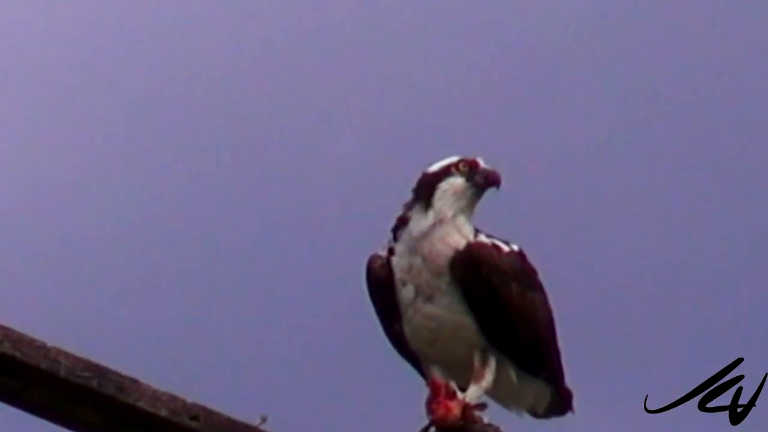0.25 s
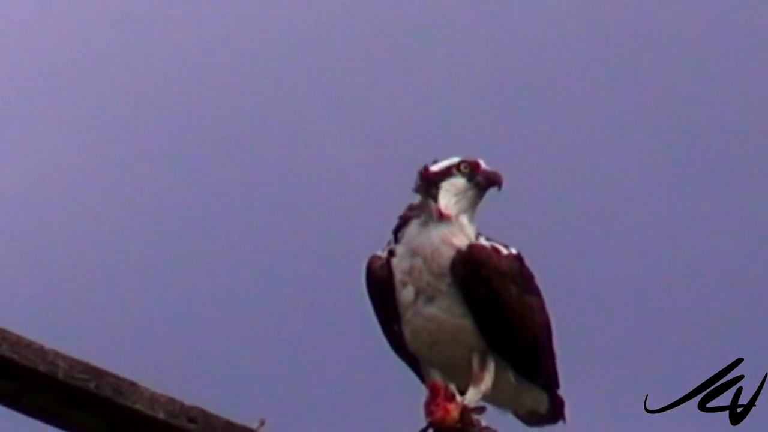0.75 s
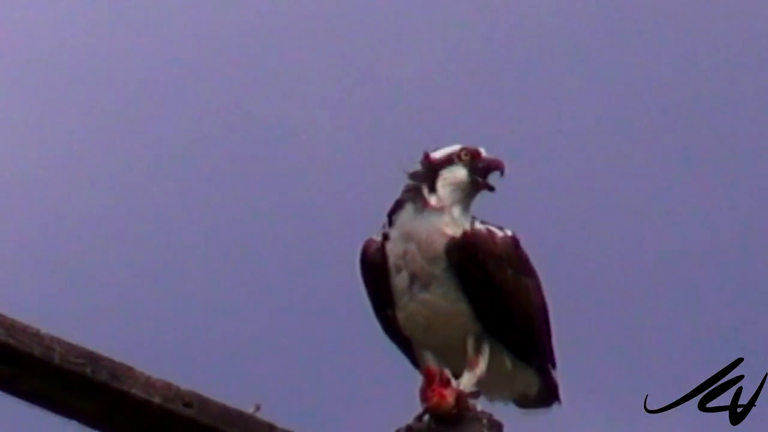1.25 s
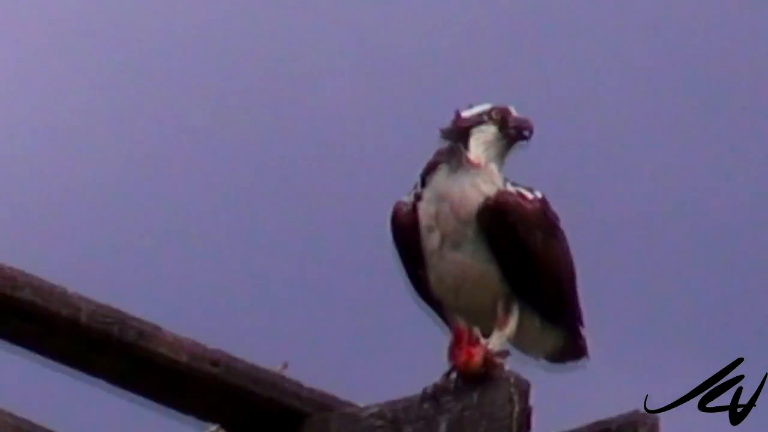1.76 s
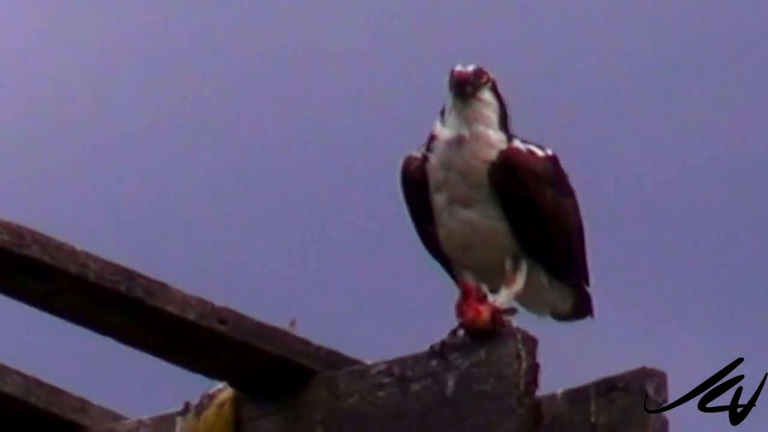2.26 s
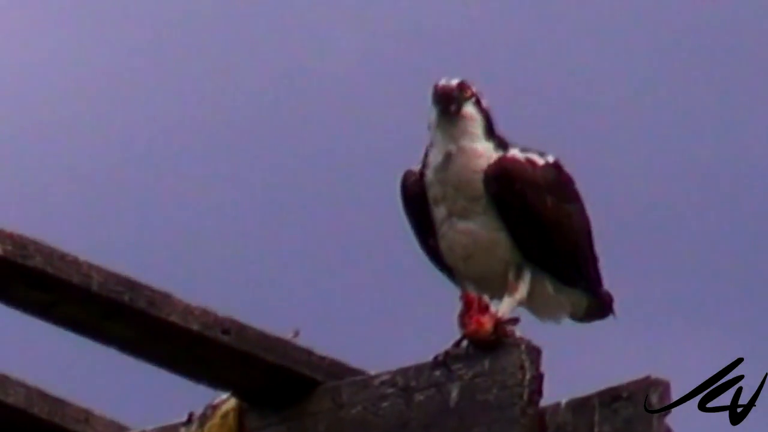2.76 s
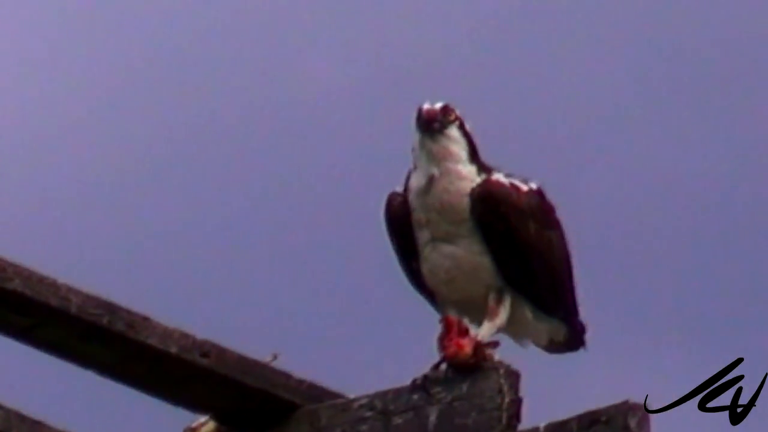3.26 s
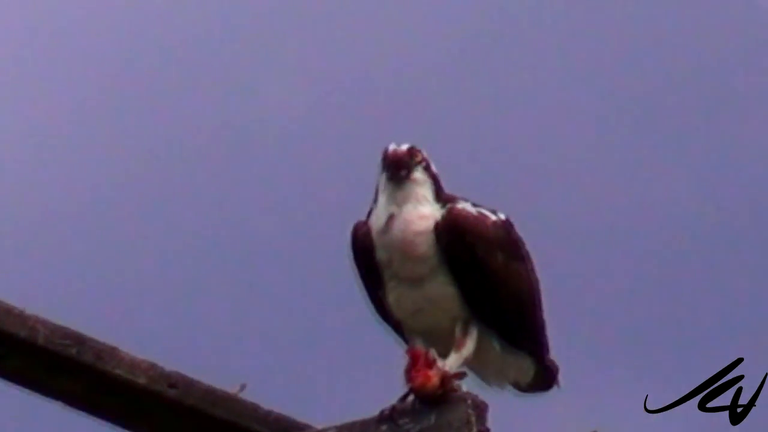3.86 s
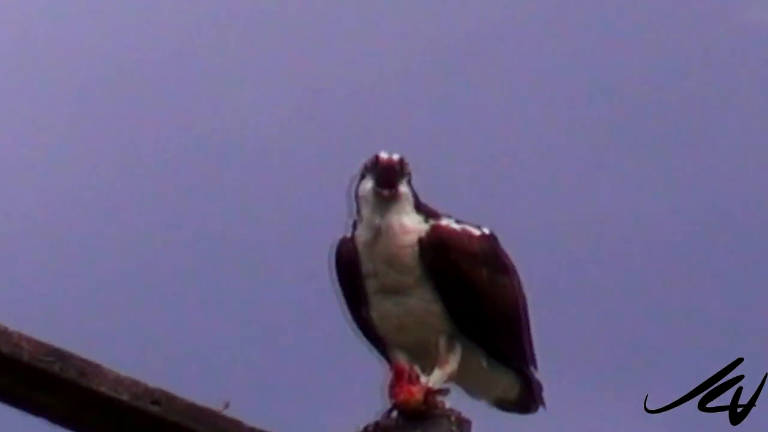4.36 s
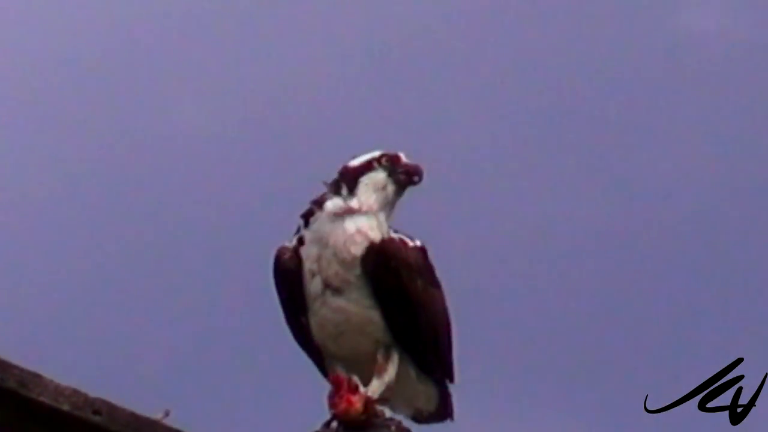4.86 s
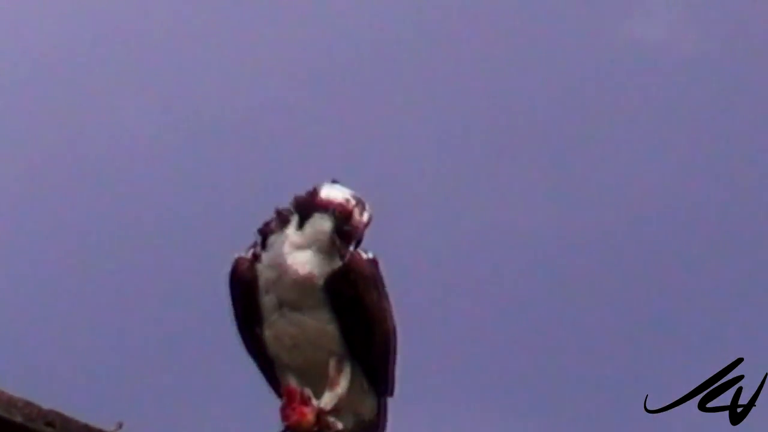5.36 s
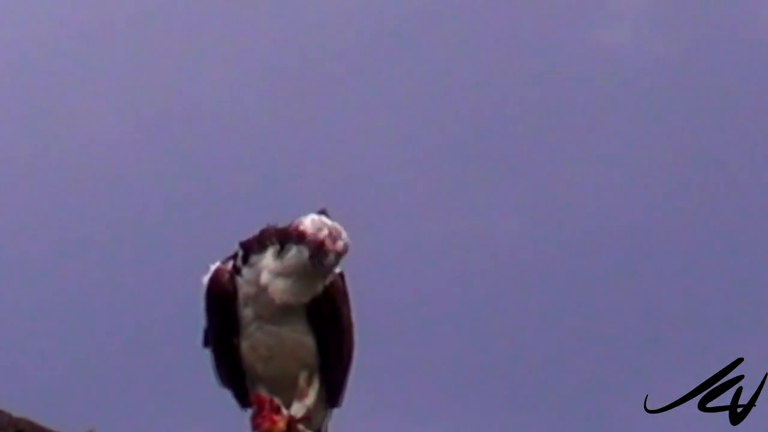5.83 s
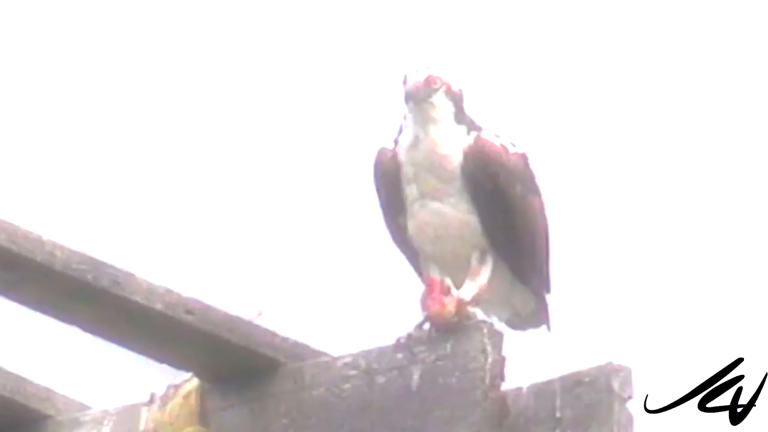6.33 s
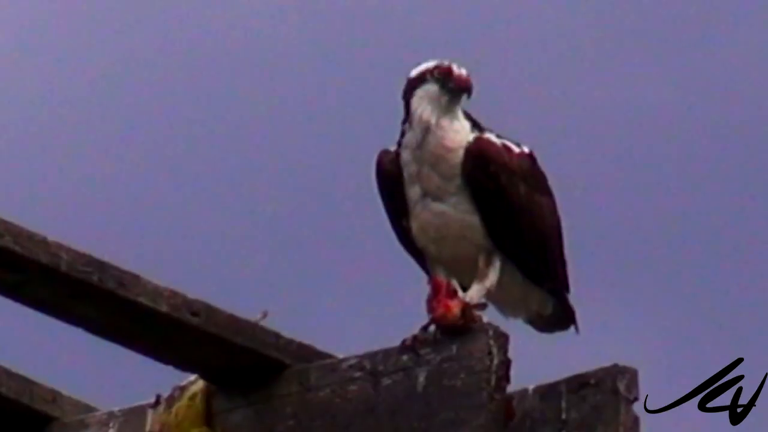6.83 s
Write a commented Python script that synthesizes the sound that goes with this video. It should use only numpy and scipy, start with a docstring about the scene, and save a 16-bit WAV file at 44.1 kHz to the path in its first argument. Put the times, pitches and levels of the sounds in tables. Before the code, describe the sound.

An osprey on an outdoor perch gives nine short, piercing falling whistles, loudest in the middle, over soft breeze, distant traffic and faint camera-handling knocks.

```python
"""Bird of prey calling from a perch

A perched bird of prey whistles nine short, mostly falling chirps; two use both sides of its syrinx (voice box).
Each is a gliding sine with overtones; echoes within a few ms notch it and fading noise makes the trees' faint tail.
Shaped noise makes the breeze, far traffic, a motor drone and leaves; short sine glides make small birds' peeps.
A hand shifts on the camera in noise snaps, knocks and rustles, and breeze thumps its microphone in sine bumps."""
import sys
import numpy as np
from scipy import signal
from scipy.fft import rfft, irfft, next_fast_len
from scipy.io import wavfile
from scipy.ndimage import uniform_filter1d, map_coordinates

SR = 44100
rng = np.random.default_rng(int(sys.argv[2]) if len(sys.argv) > 2 else 0)


def store_pcm(level_fs):
    """Save levels as 16-bit WAV."""
    pcm = np.round(np.clip(level_fs, -1, 1) * 32767).astype(np.int16)
    wavfile.write(sys.argv[1], SR, np.atleast_2d(pcm).T)


N = 312669  # length in samples
TOP_HZ = 15790  # upper band limit

# The pitch path of each chirp, one list per chirp. Each row: time in seconds, pitch in Hz.
CHIRP_PITCHES = [
    [(0, 2540), (0.018, 2338), (0.032, 2242), (0.047, 2140), (0.065, 1780)],
    [(0.588, 3330), (0.598, 3080), (0.612, 2836), (0.64, 2670), (0.65, 2880), (0.664, 2810), (0.682, 2352),
     (0.696, 2176), (0.708, 2110), (0.721, 1880)],
    [(1.315, 3766), (1.335, 3256), (1.369, 3066), (1.411, 2637), (1.441, 2245), (1.456, 2110),
     (1.472, 1890)],
    [(2.102, 4380), (2.118, 4465), (2.133, 4000), (2.15, 3674), (2.182, 3435), (2.214, 3229), (2.246, 2905),
     (2.28, 2287), (2.293, 2150), (2.306, 1850)],
    [(2.942, 4620), (2.963, 5340), (2.979, 4300), (2.995, 3790), (3.03, 3529), (3.084, 3187), (3.128, 2383),
     (3.146, 2150), (3.16, 1930)],
    [(3.752, 2955), (3.768, 3010), (3.792, 2922), (3.834, 2858), (3.9, 2812), (3.93, 2710), (3.948, 2590)],
    [(4.399, 5246), (4.414, 5200), (4.427, 4140), (4.445, 3520), (4.483, 3300), (4.523, 2996),
     (4.545, 2651), (4.571, 2130), (4.582, 1930)],
    [(5.327, 2871), (5.353, 2904), (5.381, 2854), (5.459, 2820), (5.485, 2757), (5.503, 2584),
     (5.525, 2450)],
    [(6.078, 3460), (6.088, 3182), (6.108, 2850), (6.128, 2543), (6.158, 2226), (6.17, 2131), (6.184, 1810)],
]


def amp(db):
    """Turn dB into a gain."""
    return 10 ** (np.asarray(db) / 20)


def unit(x):
    """Scale a sound to an rms (average strength) of 1."""
    return x / np.sqrt(np.mean(x ** 2) + 1e-20)


def along(points, hz):
    """Read a curve of (Hz, value) points, with frequency on a log axis."""
    f, v = np.transpose(points)
    return np.interp(np.log(hz + 1), np.log(f + 1), v)


def curves(rows, glide=.005):
    """Give one value per sample for each column after the time, with corners rounded over glide seconds."""
    s, *cols = np.transpose(rows)
    width = max(round(glide * SR), 1)
    t = np.arange(N) / SR
    return [uniform_filter1d(np.interp(t, s, c), width) for c in cols]


def sounding(t0, t1, fade):
    """Stay at 1 between two times, with a fade before and after, all in seconds."""
    t = np.arange(N) / SR
    ramp = np.minimum(t - t0 + fade, t1 + fade - t) / fade
    return np.clip(ramp, 0, 1) ** 2


def wobble(rate):
    """Draw a smooth random curve through rate random points a second."""
    knots = rng.standard_normal(int(N * rate / SR) + 4)
    return map_coordinates(knots, [np.arange(N) * rate / SR])


def filtered(x, response):
    """Filter x by a response that depends on frequency and may be complex."""
    m = next_fast_len(N + SR // 2)
    spectrum = rfft(x, m) * response(np.fft.rfftfreq(m, 1 / SR))
    return irfft(spectrum, m)[..., :N]


def peak(hz, centre_hz, width_hz):
    """Respond like one resonance, which rings only after it is driven."""
    return 1j * hz * width_hz / (centre_hz ** 2 - hz * hz + 1j * hz * width_hz)


def sides(pan_db):
    """Give left and right gains; a positive pan makes the left louder."""
    return amp(np.array([[.5], [-.5]]) * pan_db)


def rush(spectrum, patchy_db):
    """Make stereo noise of rms 1, with random louder and softer patches in time and pitch."""
    # How alike left and right are. Each row: frequency in Hz, likeness from 0 to 1.
    likeness = [(40, .96), (130, .84), (290, .7), (640, .81), (1400, .82), (3800, .95), (6800, .72),
                (15000, .82)]
    # Left-right balance. Each row: frequency in Hz, left over right in dB.
    balance = [(60, 1.5), (130, 1.5), (290, -5.5), (640, 1.5), (1410, 4.5), (3100, 0), (6820, 2),
               (15000, -0.5)]
    z = signal.stft(rng.standard_normal((2, N)), nperseg=512)[2]
    field = uniform_filter1d(rng.standard_normal(z.shape[1:]), size=6, axis=0)
    field = uniform_filter1d(field, size=14, axis=1)
    pair = signal.istft(z * amp(patchy_db * unit(field)), nperseg=512)[1][:, :N]

    def shares(hz):
        turn = np.arccos(np.clip(along(likeness, hz), -1, 1)) / 2
        return amp(along(spectrum, hz)) * [np.cos(turn), np.sin(turn)]

    mid, side = filtered(pair, shares)
    stereo = np.array([mid + side, mid - side])
    return unit(filtered(stereo, lambda hz: sides(along(balance, hz))))


def lead_in():
    """Make a falling, swelling sine for the chirp already under way; only its echoes are still in the air."""
    # In order: length in seconds, start pitch in Hz, end pitch in Hz, level at the end in dB.
    length, hz0, hz1, db = (0.83, 2950, 2570.5, -29)
    n = round(length * SR)
    phase = 2 * np.pi * np.cumsum(np.linspace(hz0, hz1, n)) / SR
    return amp(db) * np.linspace(0, 1, n) * np.sin(phase)


def bird():
    """Whistle near-pure glides; the weak side of the syrinx modulates them into sum and difference tones."""
    # How each chirp is blown. Each row: level in dB before the pitch curve, attack in seconds,
    # the strongest point as a share of the length, dB lost per length away from there, release in seconds,
    # octave and third harmonic in dB against the whistle before their own curves,
    # left-right balance in dB, strength aimed at the trees in dB.
    efforts = [(-16.5, 0.00033, 0.57, 11, 0.0028, -21, -36, 3, -2.5),
               (-15, 0.0077, 0.94, 17, 0.0017, -21.5, -48, 3, -2.5),
               (-15.5, 0.034, 0.46, 6, 0.0033, -22.5, -42.5, 2, -0.2),
               (-13.5, .008, .75, 11.5, 0.014, -23.5, -47, -0.7, -1.1),
               (-10.5, 0.0024, 0.69, 8.1, 0.018, -22.5, -45, -0.3, -3.5),
               (-17, 0.0057, .4, 4.8, 0.011, -13.5, -28, 0, -6.5),
               (-8, .004, 0.59, 13.13, 0.018, -23, -44, -0.3, -3.2),
               (-17.5, 0.0037, 0.95, 9.4, 0.034, -8.5, -25, 0.5, -3.5),
               (-17, 0.014, 0.51, 10.3, 0.0027, -21.5, -37, 1, 0.2)]
    # Strength of the whistle by pitch. Each row: pitch in Hz, gain in dB.
    whistle_gain = [(1850, -26), (2070, -14), (2190, -4.5), (2330, -4), (2520, -1.5), (2800, 0),
                    (3300, 0.25), (3600, -1), (4200, -12), (5250, -23)]
    # Strength of the octave by pitch of the whistle. Each row: whistle pitch in Hz, gain in dB.
    octave_gain = [(1900, -4), (2200, 3.9), (2400, 6), (2800, 1.4), (3200, -1.5), (3460, -10), (3700, 4.5),
                   (4200, 5.5), (5200, 5)]
    # Higher overtones. Each row: harmonic number, dB over the chirp's third-harmonic setting,
    # further dB per octave of pitch above 3000 Hz.
    higher = [(3, 0.1, 14), (4, -13.5, 0.5)]
    # Air bursts near the start of some chirps. Each row: start in seconds, gain in dB before filtering.
    air_bursts = [(2.96, -49.5), (2.975, -47), (3.747, -36.5), (4.417, -55.5), (5.323, -42.5)]
    attack_db, release_db = 24, 14  # how far each end is pulled down, beside the slope and the fades

    t = np.arange(N) / SR
    low, upper, pan_db, aim_db = np.zeros((4, N))
    for rows, effort in zip(CHIRP_PITCHES, efforts):
        db, attack_s, crest, slope_db, release_s, bright_db, third_db, facing_db, trees_db = effort
        hz, = curves(rows, glide=.007)
        start, end = rows[0][0], rows[-1][0]
        age = np.clip(t - start, 0, end - start)
        ends_db = attack_db * np.exp(-age / attack_s)
        ends_db += release_db * np.exp((age + start - end) / release_s)
        off_crest = np.abs(age / (end - start) - crest)
        level_db = db + along(whistle_gain, hz) - slope_db * off_crest - ends_db
        phase = 2 * np.pi * np.cumsum(hz * (1 + 0.0023 * wobble(200))) / SR
        size = amp(level_db + .7 * wobble(120)) * sounding(start, end, .003)
        low += size * np.sin(phase)

        # the overtones flicker at random in level, faster than the whistle glides
        flicker_db = 2.5 * wobble(70)
        octave_db = bright_db + along(octave_gain, hz) - .4 * ends_db + flicker_db
        over = amp(octave_db) * np.cos(2 * phase)
        tight = np.log2(hz / 3000)  # tighter membranes at high pitch close more sharply
        for k, extra_db, per_octave_db in higher:
            harmonic_db = extra_db + third_db + per_octave_db * tight + 2.9 * wobble(40)
            over += amp(harmonic_db) * (k * hz < TOP_HZ) * np.sin(k * phase)
        upper += size * over
        # balance and aim hold until the next chirp
        pan_db[t > start - .05] = facing_db
        aim_db[t > start - .05] = trees_db

    weak, octave, on = weak_side()
    mixed = amp(24.5) * low * weak + amp(32.5) * upper * weak
    mixed = filtered(mixed, lambda f: peak(f, 5500, 7000) ** 2)
    # two voices fighting shake every partial into a blur
    shake = unit(filtered(rng.standard_normal(N), lambda f: 1 / (1 + (f / 1000) ** 4)))
    rasp = on * shake * (amp(-18.5) * low + amp(-13) * upper)
    blur = filtered(rasp, lambda f: 1 / (1 + (2600 / (f + 1)) ** 6))  # keeps the treble
    gusts = sum(amp(db) * sounding(s, s + 0.011, .003) for s, db in air_bursts)
    breath = filtered(gusts * rng.standard_normal(N), lambda f: peak(f, 5000, 3000) ** 2)
    return low + upper + weak + octave + blur + mixed + breath, pan_db, aim_db


def near(x):
    """Add two early echoes to the direct sound; the surfaces return only the lower tones."""
    # Each row: delay in seconds, level in dB, frequency in Hz above which the echo is lost.
    surfaces = [(.0027, 0, 2950), (.00519, -17, 4200)]

    def response(f):
        total = 1
        for s, db, hz in surfaces:
            total = total + amp(db) * np.exp(-2j * np.pi * f * s) / (1 + (f / hz) ** 18)
        return total

    return filtered(x, response)


def scatter(early, x, decays, tone, rise_s, spread, pan_db, edge=(1, 0)):
    """Answer each call with fresh fading noise; each frequency dies at its own speed."""
    x = np.concatenate([early, x])
    wet = np.zeros((2, len(x)))
    for rows in CHIRP_PITCHES:
        hz, t, z = signal.stft(rng.standard_normal((2, SR)), SR, nperseg=256)
        drop_db = edge[1] * np.clip((t - edge[0]) / 0.11, 0, 1)
        decay_db = -60 * t / along(decays, hz)[:, None]
        shape = (1 - np.exp(-t / rise_s)) * amp(drop_db + decay_db)
        colour = amp(along(tone, hz))[:, None]
        a, b = signal.istft(z * shape * colour, SR, nperseg=256)[1]
        energy = np.sum(shape[16] ** 2) * 128  # of the fade near the call's pitch
        tail = sides(pan_db) * [a + spread * b, a - spread * b] / np.sqrt(energy)
        # the slice begins one lead-in length before the call, so it also holds what came just before
        i = round(rows[0][0] * SR)
        j = round((rows[-1][0] + .05) * SR) + len(early)
        answer = signal.fftconvolve(x[None, i:j], tail, axes=1)[:, :len(x) - i]
        wet[:, i:i + answer.shape[1]] += answer
    return wet[:, len(early):]


def air():
    """Mix the background: breeze, far traffic with a motor drone and a tyre band, and leaves, all from noise."""
    # Strength of the breeze. Each row: time in seconds, level in dB before a random wobble.
    breeze_level = [(0, -61), (0.45, -61), (0.63, -53), (0.91, -61), (1.56, -60), (2.2, -55.5),
                    (2.9, -60.5), (3.53, -60), (3.85, -58), (4.7, -63), (4.95, -55.5), (5.15, -60.5),
                    (5.8, -61), (6.44, -61), (7.09, -59)]
    # Tone of the breeze. Each row: frequency in Hz, relative level in dB per Hz.
    breeze_tone = [(12, -37), (20, -10), (75, -1), (140, -0.5), (271, -12), (300, -30.5), (390, -35),
                   (660, -120)]
    # Tone of the traffic. Each row: frequency in Hz, relative level in dB per Hz.
    traffic_tone = [(120, -31.5), (200, -8), (270, -2), (494, -2), (523, -0.5), (785, -4.5), (873, -8),
                    (1260, -10), (1400, -12.5), (1820, -39.5), (3080, -120)]
    # Tone of the leaves. Each row: frequency in Hz, relative level in dB per Hz.
    leaves_tone = [(590, -42.5), (1000, -23.5), (1400, -5.5), (2500, -6), (3300, -9), (5000, -9.5),
                   (7500, -11), (10000, -16.5), (13000, -18.5), (15800, -18.5)]
    # A far motor. In order: loud from and to in seconds, fade in seconds,
    # level added while loud in dB, level always there in dB.
    start, end, fade, near_db, far_db = (4, 5, 1, -61.5, -69)
    traffic_db, leaves_db, tyres_db = -57.5, -58, -66

    def band(hz, width_hz):
        return unit(filtered(rng.standard_normal(N), lambda f: peak(f, hz, width_hz) ** 2))

    breeze = amp(curves(breeze_level)[0] + 2.6 * wobble(9)) * rush(breeze_tone, patchy_db=2.0)
    traffic = amp(traffic_db + 0.27 * wobble(4.9)) * rush(traffic_tone, patchy_db=2.36)
    motor = amp(far_db) + amp(near_db) * sounding(start, end, fade)
    drone = motor * band(210, 80) * sides(-2)
    tyres = amp(tyres_db) * band(800, 90)
    leaves = amp(leaves_db + .4 * wobble(3.1)) * rush(leaves_tone, patchy_db=1.56)
    return breeze + traffic + drone + tyres + leaves


def handling():
    """Shift a hand on the camera: each tick is a noise snap plus a body knock, and cloth rustles too."""
    # Each row: start in seconds, snap gain in dB before filtering, knock gain in dB, left-right balance in dB,
    # snap centre in Hz, time in seconds for the snap to fall 60 dB.
    ticks = [(.415, -53, -14.5, -6, 2920, .02), (1.284, -40.5, -17, -3, 5830, 0.014),
             (1.646, -32.5, -8, -2.5, 6200, 0.018), (1.878, -45, -8.5, -4.5, 6200, 0.037),
             (2.635, -41.5, -14, 11, 4370, 0.071), (3.591, -58.5, 1, 5.5, 5770, .008),
             (3.626, -42, -1, 8, 6260, 0.005), (4.03, -48, -9, 11, 1520, 0.024),
             (4.32, -57, -12, 5.5, 1506, 0.035)]
    # Resonances of the camera body. Each row: frequency in Hz, width in Hz, gain in dB.
    body_modes = [(118, 62, 4), (243, 430, -2.5), (590, 170, 3), (1640, 390, -6.5)]
    # Each row: start in seconds, length in seconds, centre in Hz, level in dB before a random wobble.
    rustles = [(.87, .02, 8000, -63), (.98, .04, 5000, -64), (1.8, .11, 7500, -60), (2.64, .03, 5300, -58),
               (4.24, .07, 2700, -57), (4.77, .04, 5200, -63), (6.96, .06, 3500, -63)]

    def body(f):
        return sum((-1) ** k * amp(db) * peak(f, c, w) for k, (c, w, db) in enumerate(body_modes))

    t = np.arange(N) / SR
    out, blows = np.zeros((2, N)), np.zeros((2, N))
    for s, db, knock_db, pan_db, hz, t60 in ticks:
        burst = (t >= s) * amp(-60 * np.abs(t - s) / t60) * rng.standard_normal(N)
        snap = filtered(burst, lambda f: peak(f, hz, 1.3 * hz) ** 2)
        out += sides(pan_db) * amp(db) * snap
        blows[:, round(s * SR)] = sides(pan_db)[:, 0] * amp(knock_db)
    cloth = rng.standard_normal((2, N)) + 2.1 * rng.standard_normal(N)  # mostly shared by both sides
    for s, length, hz, db in rustles:
        grit = unit(filtered(cloth, lambda f: peak(f, hz, 0.44 * hz) ** 2))
        out += amp(db + 2.5 * wobble(150)) * sounding(s, s + length, .02) * grit
    return out + filtered(blows, body)


def thumps():
    """Push the microphone with puffs of breeze: a sine that swells and dies within a cycle or two."""
    # Each row: start in seconds, gain in dB before the swell, pitch in Hz, left-right balance in dB.
    pushes = [(0.507, -15.5, 115, 4), (0.528, -20.5, 89, 5), (0.602, -25, 59, -3), (0.63, -15.5, 105, 1.5),
              (0.676, -23, 72, 0), (.715, -29, 90, 2), (1.136, -21, 85.5, 3), (1.161, -24.5, 107, 3),
              (1.773, -11, 181, -3.5), (1.78, -16.5, 141, 1), (1.889, -18, 197, -5),
              (1.901, -17.5, 248, -7), (3.761, -22, 108, 1)]
    out, t = np.zeros((2, N)), np.arange(N) / SR
    for s, db, hz, pan_db in pushes:
        cycles = np.clip(t - s, 0, 1) * hz
        swell = cycles * np.exp(-cycles / 0.31)
        out += sides(pan_db) * amp(db) * swell * np.sin(2 * np.pi * cycles)
    return out


def small_birds():
    """Peep faintly from far off: short sines that glide in pitch and waver in level."""
    # Each row: start in seconds, length in seconds, start pitch in Hz, end pitch in Hz,
    # level in dB before a random wobble.
    peeps = [(1.78, .015, 4650, 4850, -67), (5.03, .03, 2450, 2200, -57), (5.14, .08, 3050, 2830, -60),
             (5.24, .01, 2500, 2300, -61), (5.71, .012, 3400, 3250, -58), (5.75, .11, 2430, 2380, -62),
             (5.79, .08, 1680, 1620, -65)]
    t, out = np.arange(N) / SR, np.zeros(N)
    for s, length, hz0, hz1, db in peeps:
        hz = np.interp(t, [s, s + length], [hz0, hz1])
        phase = 2 * np.pi * np.cumsum(hz) / SR
        out += amp(db + 2.5 * wobble(60)) * sounding(s, s + length, .008) * np.sin(phase)
    return out


def weak_side():
    """Sound the second membrane: an unsteady whistle with its octave, and how hard it shakes the first."""
    # The weaker voice, one list per two-voiced chirp.
    # Each row: time in seconds, pitch in Hz and level in dB, both before a random wobble.
    second_voice = [
        [(3.765, 2350, -53.5), (3.9, 2100, -46), (3.932, 2240, -37), (3.952, 2030, -28.5), (3.972, 1890, -46)],
        [(5.37, 2230, -59), (5.404, 2155, -54), (5.44, 2206, -49), (5.485, 2120, -55.5)],
    ]
    # How hard the two voices fight, in dB, one value per two-voiced chirp.
    fight_db = [-3, -8]
    tone, octave, on = np.zeros((3, N))
    for rows, rasp_db in zip(second_voice, fight_db):
        hz, db = curves(rows)
        phase = 2 * np.pi * np.cumsum(hz * (1 + .013 * wobble(300))) / SR
        gate = sounding(rows[0][0], rows[-1][0], .006)
        size = amp(db + 2.2 * wobble(200)) * gate
        tone += size * np.sin(phase)
        octave += amp(21.5) * size ** 2 * np.sin(2 * phase)  # grows faster than the whistle
        on += amp(rasp_db) * gate
    return tone, octave, on


def scene():
    """Add up everything that reaches the two microphone ports."""
    # Fading of beams and ground nearby. Each row: frequency in Hz, time in seconds to fall 60 dB.
    perch_decay = [(1500, 0.055), (3000, 0.039), (6000, 0.15), (12000, .12)]
    # Tone of that answer. Each row: frequency in Hz, gain in dB.
    perch_tone = [(2000, -11.5), (3200, -15.5), (4500, -18), (7000, -16.5), (12000, -18)]
    # Fading of the trees' answer. Each row: frequency in Hz, time in seconds to fall 60 dB.
    trees_decay = [(1500, 0.35), (3000, 1.08), (5500, 0.86), (10000, 0.22)]
    # Tone of the trees' answer. Each row: frequency in Hz, gain in dB.
    trees_tone = [(2000, -14.5), (3000, -20.5), (4000, -24), (6000, -20), (10000, -34.5)]
    # The nearest trees stop answering. In order: seconds after the sound when the drop begins, change in dB.
    tree_line = (0.18, -4.5)

    voice, pan_db, aim_db = bird()
    call, early = near(voice) * sides(pan_db), lead_in()
    perch = scatter(early, voice, perch_decay, perch_tone, rise_s=0.0055, spread=.4, pan_db=0.0)
    trees = scatter(early, voice * amp(aim_db), trees_decay, trees_tone,
                    rise_s=.015, spread=.13, pan_db=4.0, edge=tree_line)
    return call + perch + trees + air() + handling() + thumps() + small_birds()


def record(dry):
    """Keep nothing above the camera's band limit."""
    return filtered(dry, lambda hz: hz < TOP_HZ)


dry = scene()
out = record(dry)
store_pcm(out)
```